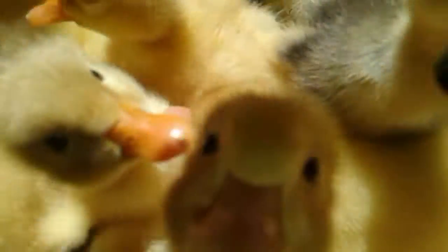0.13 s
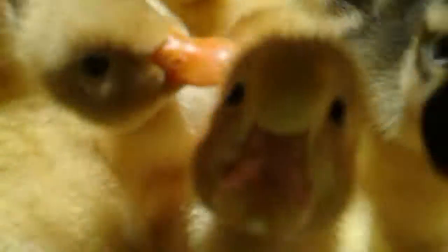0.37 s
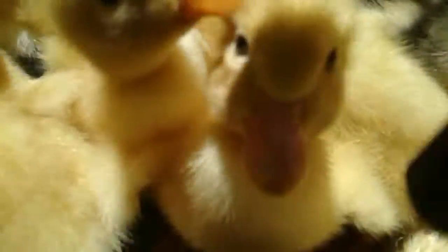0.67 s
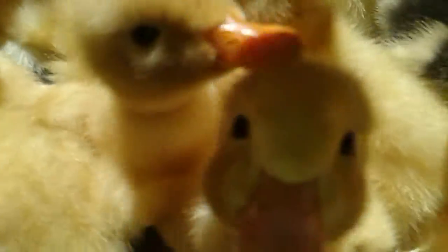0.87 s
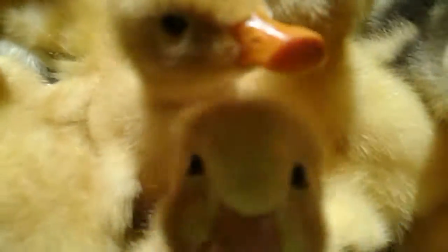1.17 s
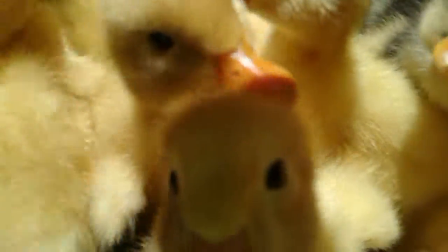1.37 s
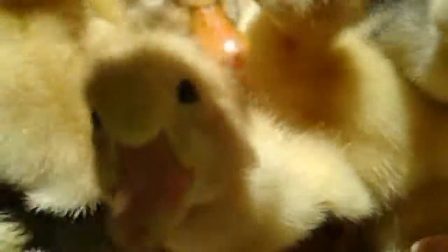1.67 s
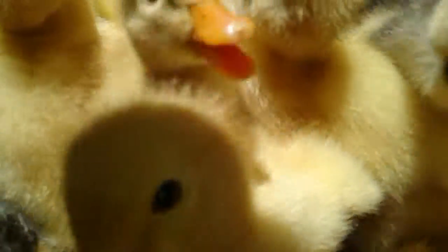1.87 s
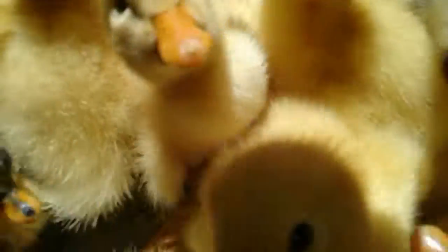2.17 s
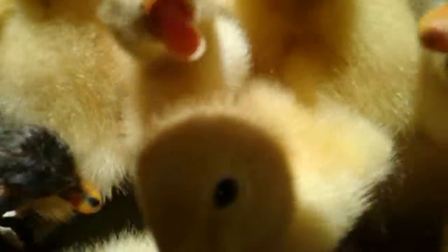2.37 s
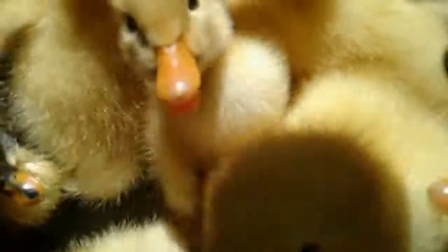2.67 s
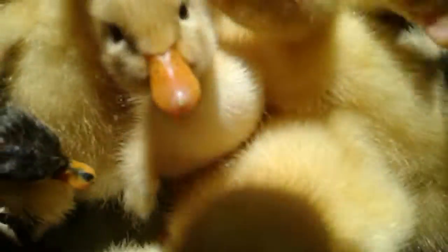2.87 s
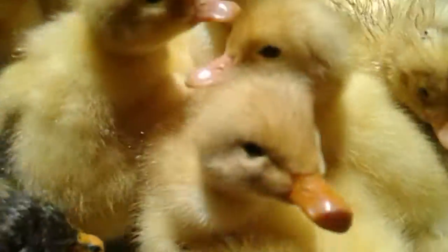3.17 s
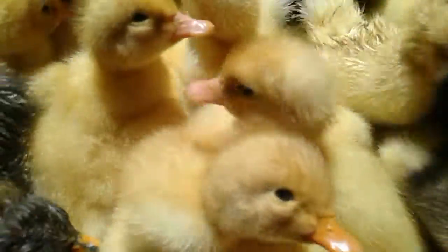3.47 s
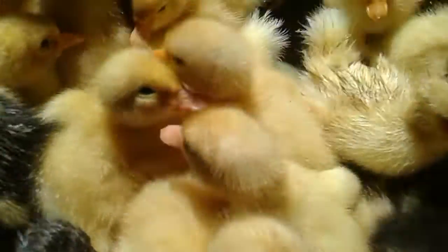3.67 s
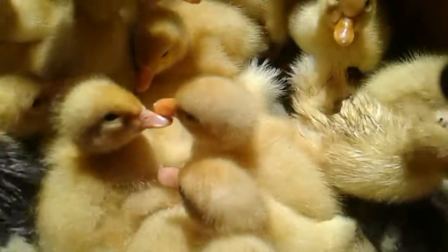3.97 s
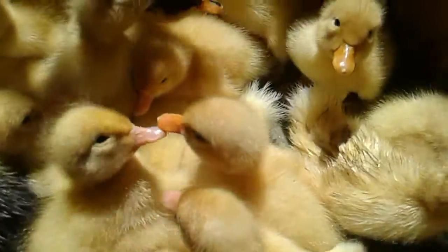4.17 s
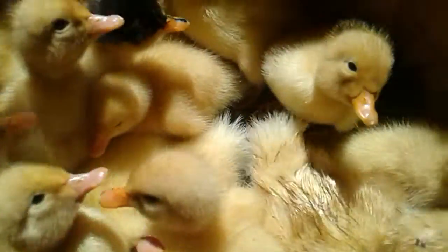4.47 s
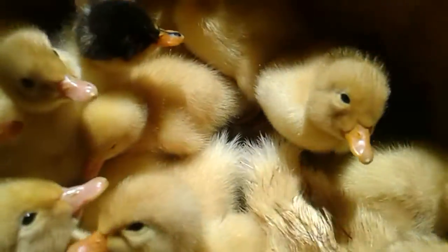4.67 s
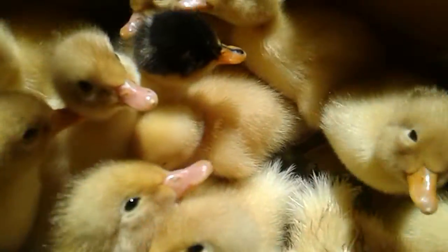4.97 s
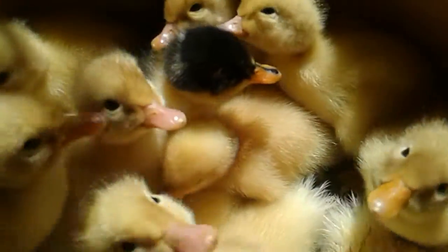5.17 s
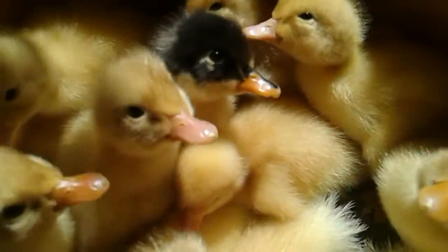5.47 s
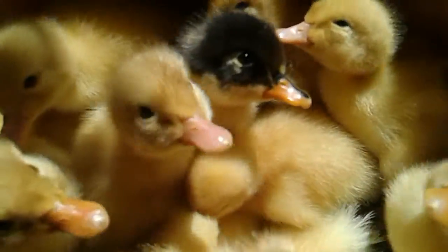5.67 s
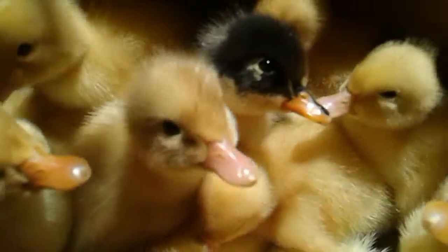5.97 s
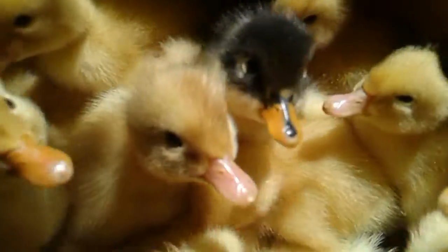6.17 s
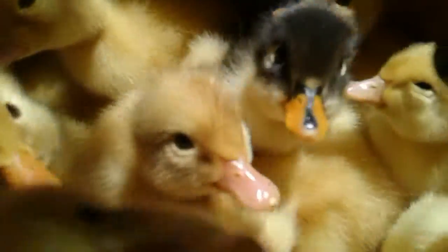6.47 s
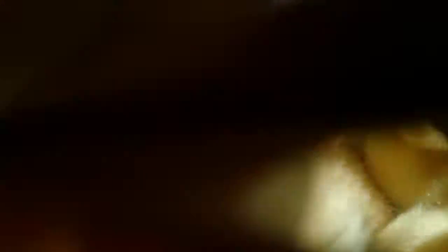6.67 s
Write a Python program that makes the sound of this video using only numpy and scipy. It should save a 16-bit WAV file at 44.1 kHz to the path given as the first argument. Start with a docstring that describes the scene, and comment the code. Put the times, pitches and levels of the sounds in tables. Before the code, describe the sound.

A nearby duckling peeps softly, then in loud, piercing, rough-edged cries three times a second until 4.8 seconds; small knocks and faint rustling remain.

```python
"""In a box, ducklings huddle close to a small microphone. One peeps about three times a second,
softly and then in loud cries: a near-sine whistle plus two overtones, roughened by a second voice until both lock.
Others give short arched chirps. Feet and bodies knock (decaying panel modes, noise bursts) and scrape
(gritty filtered noise); bright clicks (noise bursts) come alone or as the edge of a knock.
Padded steps shuffle over a rumble, a thin hiss and a low drone."""
import sys
import numpy as np
from scipy import signal
from scipy.fft import rfft, irfft
from scipy.io import wavfile

SR = 44100
rng = np.random.default_rng(int(sys.argv[2]) if len(sys.argv) > 2 else 0)


def wav_out(sig):
    """Save sig, one row per channel (or a flat mono array), as 16-bit PCM at SR to the path in sys.argv[1]."""
    wavfile.write(sys.argv[1], SR, np.round(np.clip(np.atleast_2d(sig).T, -1, 1) * 32767).astype(np.int16))


N = 300741

# calls of the nearest duckling: (start [s], length [s], top pitch [Hz], effort [0-1],
# base level [dB], base overtone level [dB], second voice level, independent of the call's level [dB])
CALLER_PEEPS = [ (.003, 0.093, 3040, 0.32, -32, -23, -42), (0.628, 0.097, 2934, 0.25, -39.5, -14.5, -47.5),
                (0.898, 0.11, 3390, 0.53, -40, -25.5, -46.5), (1.32, 0.11, 3320, .4, -35, -28.5, -47),
                (1.698, 0.11, 3340, 0.8, -33, -30.5, -48), (1.949, 0.11, 3650, 1, -27.5, -33.5, -36.5),
                (2.246, .12, 3690, 0.97, -27, -33.5, -39.5), (2.541, .12, 3734, 0.98, -27, -32.5, -38.5),
                (2.807, .12, 3910, 0.99, -26.5, -32, -36), (3.13, .12, 3684, 0.98, -27.5, -32, -43.5),
                (3.426, .12, 3670, 0.86, -27, -31.5, -40), (3.733, 0.12, 3814, 0.93, -27.5, -27, -37),
                (4.031, .121, 3740, 0.82, -29, -24.5, -35), (4.328, .12, 3650, 0.89, -27.5, -25.5, -33.5),
                (4.64, 0.12, 3740, 1, -28, -26, -36)]
# caller turned from the microphone, end values held: (time [s], how far away [0-1])
TURNED_AWAY = [(3.43, 0.25), (4.03, 1), (4.64, 0.54)]
# gain of the fundamental through bill and box: (frequency [Hz], gain [dB])
BILL_RESPONSE = [(1800, 10.5), (2150, 0.5), (2500, -0.5), (2950, -8.5), (3250, -0.5), (3550, 4.5),
                 (3900, 0), (4600, -0.5)]
# gain of the overtones through throat and open bill: (frequency [Hz], gain [dB])
THROAT_RESPONSE = [(3500, 9), (4800, 9), (6200, 6), (7400, -4.5), (8500, -3), (9800, 3.5), (11500, -16.5)]
# calls of the other ducklings: (start [s], length [s], top pitch [Hz], base level [dB],
# level change over the call [dB], pitch jitter [fraction of pitch])
FLOCK_CHIRPS = [ (0.202, 0.042, 5240, -48, 3, 0.01), (1.015, 0.052, 3500, -54.5, 6, 0.07),
                (1.27, 0.097, 3450, -62.5, -16, 0.02), (1.501, 0.071, 3400, -58, -36, 0.03),
                (1.685, 0.053, 3500, -51, 3, 0.04), (4.599, 0.087, 3290, -56.5, 5, 0.03),
                (4.681, .076, 3030, -53, -7, 0.02), (4.754, .066, 3730, -46.5, -1, 0),
                (4.822, 0.078, 3150, -52, 1, 0.02), (6.369, 0.043, 2530, -58.5, -6, 0.01),
                (6.549, 0.04, 2740, -59.5, -12, 0.05)]
# feet and bodies on the box: (time [s], panel pitch [Hz], base level [dB], hardness: clack over base level [dB])
BOX_KNOCKS = [(.05, 600, -52.5, 11), (0.116, 530, -48, -2), (.225, 600, -41, -4), (.301, 590, -44.5, -1),
              (0.332, 468, -32, -7.5), (.449, 560, -42.5, -1), (.478, 500, -49.5, -17),
              (1.115, 563, -36.5, 8), (1.939, 570, -46.5, 5), (2.14, 334, -42, 12), (2.306, 316, -53, 13.5),
              (2.376, 330, -45.5, 3), (2.451, 326, -46, 6), (2.471, 514, -41.5, -15), (2.48, 474, -38, -8),
              (2.797, 317, -50.5, -18), (2.837, 307, -42, -6.5), (3.027, 312, -45.5, -7),
              (4.666, 860, -58, 19.5), (5.599, 465, -46.5, -12), (5.625, 540, -48.5, -3),
              (5.904, 385, -44, -18), (6.102, 360, -47.5, 7), (6.283, 292, -43, -22),
              (6.308, 524, -37.5, 2), (6.448, 495, -48.5, 5.5), (6.583, 576, -34, 4),
              (6.592, 488, -28.5, 5.5), (6.627, 527, -50, 22), (6.644, 490, -37, 0),
              (6.726, 537, -45.5, -21)]
# modes of the box panel: (multiple of panel pitch [1], t60 [s], relative level [dB])
PANEL_MODES = [(.56, 0.029, -2.5), (1.002, 0.017, 9.5), (1.35, 0.02, -10.5)]
# bright clicks, some alone, some as the bright edge of a knock: (time [s], level of the upper burst [dB])
BRIGHT_CLICKS = [(.138, -45), (0.335, -42.5), (.794, -47), (.883, -43.5), (1.448, -42), (1.659, -41.5),
                 (1.778, -48), (1.939, -40), (2.468, -37), (4.228, -42.5), (4.478, -41), (5.625, -43),
                 (6.583, -26), (6.591, -33.5)]
# feet and down on the box: (start [s], length [s], scratch level before swell [dB],
# rub level before swell [dB], hiss mixed into the scratch [dB])
BOX_SCRAPES = [(2.114, .18, -44, -53, -3), (3.325, 0.18, -44.5, -57.5, -4), (3.738, 0.077, -46.5, -78, -3),
               (4.015, 0.1, -50.5, -65, -3), (4.342, 0.049, -43.5, -73, 5), (5.23, 0.31, -60, -61, 3),
               (5.683, 0.13, -58, -54.5, 0), (6.217, 0.081, -53.5, -57.5, -3)]
# restlessness of the huddle, used relative to its mean: (time [s], level [dB])
HUDDLE_STIR = [(0.0, -64), (0.15, -62.5), (0.3, -62.5), (0.49, -69.5), (1.42, -68.5), (1.63, -61),
               (1.92, -64.5), (2.3, -58.5), (2.47, -61), (2.6, -61.5), (2.92, -67), (3.28, -62),
               (4.75, -60), (4.96, -66.5), (5.22, -67), (5.37, -64.5), (6.67, -65.5), (6.82, -67)]
# spectral shape of the background: (frequency [Hz], relative gain [dB])
FLOOR_SHAPE = [(15, -43), (25, -20.5), (86, -6), (191, -1.5), (459, -8), (536, -9), (642, -8.5), (897, -12),
               (1100, -11.5), (1850, -12.5), (2390, -14), (3090, -19), (4660, -16), (6860, -20),
               (11800, -21.5), (15300, -57), (22000, -120)]
# low resonances of the room: (centre [Hz], width of each filter pass [Hz], level [dB])
DRONE_MODES = [(64.5, 10, -78.5), (102.9, 21.5, -69.5)]

# peep pitch: leap from rest to top, sag towards the knee under effort, drop as the bill closes
REST_HZ, KNEE_HZ = 1904, 3013
LEAP_S, SAG_FROM_S, SAG_LEAD_S = 0.028, 0.043, 0.016  # sag ends SAG_LEAD_S before the call does
SOFT_DROP_S, LOUD_DROP_S = 0.073, 0.018
# two voices choke each other until they lock; effort locks them sooner
JOIN_S, SOFT_LOCK_S, LOUD_LOCK_S = 0.019, 0.06, 0.043
CHOKE_DB, SWELL_LEAD_S, SWELL_LAG_S = -18, 0.02, 0.0042  # swell spans from before to after the lock
SOFT_SECOND_HZ, LOUD_SECOND_HZ = 4460, 4814
SOFT_SLIDE, LOUD_SLIDE = 0.14, 0.76  # fraction of the gap closed
SOFT_THROB_HZ, LOUD_THROB_HZ = 175, 318.5
# peep level: opening, blip of the fundamental, air running out, release
OPEN_DB, ATTACK_S, BLIP_DB, BLIP_S = -11.5, 0.022, 13.5, 0.01
SPEND_DB_PER_S, RELEASE_S, RELEASE_DB = 77, 0.01, -11.5  # spend rate at full effort
# overtones: choked before the lock, faded as the pitch drops below the knee
SOFT_THIRD_DB, LOUD_THIRD_DB = -9, -1.5
SOFT_MUTE_DB, LOUD_MUTE_DB, SECOND_FADE_DB, THIRD_FADE_DB = -11.5, -11, -10, -16
# turned away, the voice flutters more and its fundamental loses the upper resonance
NEAR_FLUTTER, AWAY_FLUTTER, AWAY_LOSS_DB = 0.017, 0.24, -9
CHIRP_REST_HZ, CHIRP_OVERTONE_DB = 1765, -10.5
FLOOR_DB, TOP_HZ = -58.5, 11850  # background before its level changes; upper band edge


def caller():
    """Nearest duckling: soft peeps build into loud cries, partly turned away."""
    out = np.zeros(N)
    for start_s, *call in CALLER_PEEPS:
        away = np.interp(start_s, *np.transpose(TURNED_AWAY))
        add(out, start_s, peep(*call, away))
    return out


def peep(length_s, top_hz, effort, level_db, overtone_db, second_db, away):
    """One call: pitch leaps up, sags, drops as the bill closes; rough until both voices lock."""
    count = int(length_s * SR)
    t = np.arange(count) / SR

    def by_effort(soft, loud):
        """Interpolate a setting between soft and loud calls."""
        return soft + (loud - soft) * np.clip(effort, 0, 1)

    lock_s = by_effort(SOFT_LOCK_S, LOUD_LOCK_S)
    unlocked = 1 - ramp(t, lock_s - 0.008, lock_s)
    choked = 1 - ramp(t, lock_s - SWELL_LEAD_S, lock_s + SWELL_LAG_S)

    # pitch
    sag_hz = by_effort(0, top_hz - KNEE_HZ)
    crest_hz = top_hz - sag_hz * ramp(t, SAG_FROM_S, length_s - SAG_LEAD_S)
    leap = 1 - (1 - ramp(t, 0, LEAP_S)) ** 2.3
    drop = 1 - ramp(t, length_s - by_effort(SOFT_DROP_S, LOUD_DROP_S), length_s) ** 2
    jitter = (0.0011 + 0.0077 * unlocked) * wobble(count, 886)
    hz = (REST_HZ + (crest_hz - REST_HZ) * leap * drop) * (1 + jitter)

    # level
    opening_db = OPEN_DB * (1 - ramp(t, 0, ATTACK_S))
    spent_db = by_effort(0, SPEND_DB_PER_S) * np.maximum(t - lock_s, 0)
    release_db = RELEASE_DB * ramp(t, length_s - RELEASE_S, length_s) ** 2
    air_db = opening_db - spent_db + release_db
    flutter = NEAR_FLUTTER + (AWAY_FLUTTER - NEAR_FLUTTER) * away
    flutter = (flutter + 0.049 * unlocked) * wobble(count, 590)
    strength = undb(level_db + air_db) * fade(count, 0.0025) * (1 + flutter)

    # colour
    blip_db = BLIP_DB * (1 - ramp(t, 0, BLIP_S) ** 2)
    turned_db = AWAY_LOSS_DB * away * ramp(hz, 2200, 3540)
    fundamental_db = CHOKE_DB * choked + blip_db + bill_db(hz) + turned_db
    low = 1 - ramp(hz, REST_HZ, KNEE_HZ)
    mute_db = by_effort(SOFT_MUTE_DB, LOUD_MUTE_DB) * choked
    overtone_db = overtone_db + mute_db + SECOND_FADE_DB * low
    third_db = by_effort(SOFT_THIRD_DB, LOUD_THIRD_DB) + THIRD_FADE_DB * low
    voice = strength * whistle(hz, overtone_db, third_db, fundamental_db)

    # rough stretch before the lock
    a, b = int(JOIN_S * SR), int(lock_s * SR)
    gap_hz = by_effort(SOFT_SECOND_HZ, LOUD_SECOND_HZ) - top_hz
    second = second_voice(hz[a:b], gap_hz, by_effort(SOFT_SLIDE, LOUD_SLIDE))
    voice[a:b] += undb(second_db) * second
    voice[a:b] *= throb(b - a, by_effort(SOFT_THROB_HZ, LOUD_THROB_HZ))
    return voice


def whistle(hz, overtone_db, third_db, fundamental_db=0):
    """Vibrating syrinx membrane: nearly a sine, two overtones shaped by the throat."""
    phase = 2 * np.pi * np.cumsum(hz) / SR
    fundamental = undb(fundamental_db) * np.sin(phase)
    second = colour_at(THROAT_RESPONSE, 2 * hz) * np.sin(2 * phase)
    third = colour_at(THROAT_RESPONSE, 3 * hz) * np.sin(3 * phase)
    return np.sqrt(2) * (fundamental + undb(overtone_db) * (second + undb(third_db) * third))


def second_voice(first_hz, gap_hz, slide, jitter=0.053, swell=0.75, rasp=0.19):
    """Other side of the syrinx: starts high and unsteady, swells, slides towards the first."""
    count = len(first_hz)
    u = np.linspace(0, 1, count)
    steady_hz = first_hz + gap_hz * (1 - slide * u ** 3)
    hz = steady_hz * (1 + jitter * (1.2 - u) * wobble(count, 1530))
    strength = u ** swell * fade(count, 0.0022) * (1 + rasp * wobble(count, 678))
    return strength * whistle(hz, overtone_db=-28, third_db=-20)


def throb(count, rate_hz, scatter=0.25, depth=0.5):
    """Until they lock, the two membranes choke each other in uneven pulses."""
    phase = 2 * np.pi * np.cumsum(rate_hz * (1 + scatter * wobble(count, 297))) / SR
    return (1 + depth * np.cos(phase)) / np.sqrt(1 + depth ** 2 / 2)


def bill_db(hz):
    """Gain [dB] of the fundamental as it sweeps the bill and box resonances."""
    return np.interp(hz, *np.transpose(BILL_RESPONSE))


def flock(flutter=0.28, arch=2.2):
    """Short contented chirps, each an arch of pitch; the more jittery, the raspier around the crest."""
    out = np.zeros(N)
    for start_s, length_s, top_hz, level_db, tilt_db, jitter in FLOCK_CHIRPS:
        count = int(length_s * SR)
        u = np.linspace(-1, 1, count)
        arch_hz = top_hz + (CHIRP_REST_HZ - top_hz) * np.abs(u) ** arch
        hz = arch_hz * (1 + jitter * wobble(count, 957))
        strength = undb(level_db + tilt_db * u / 2) * fade(count, 0.004)
        strength = strength * (1 + flutter * wobble(count, 337))
        # nearly closed bill: overtones fade as the pitch climbs
        muffle_db = np.interp(hz, [2500, 3200, 3800], [0, -8, -20])
        voice = strength * whistle(hz, CHIRP_OVERTONE_DB + muffle_db, -14, bill_db(hz))
        crest = (u > -0.55) & (u < 0.25)
        rasp = 36 * jitter * second_voice(np.minimum(hz[crest], 3800), gap_hz=887, slide=0.26)
        voice[crest] += undb(level_db) * rasp
        add(out, start_s, voice)
    return out


def knocks(thud_db=2, clack_db=0, tick_db=-19):
    """Steps thud in the panel and, if hard, clack at the contact; bright clicks stand alone or edge a knock."""
    out = np.zeros(N)
    t = np.arange(int(0.08 * SR)) / SR
    for start_s, panel_hz, level_db, hard_db in BOX_KNOCKS:
        thud = np.zeros(len(t))
        for ratio, t60_s, mode_db in PANEL_MODES:
            thud += undb(mode_db - 60 * t / t60_s) * np.sin(2 * np.pi * ratio * panel_hz * t)
        thud *= 1 - np.exp(-t / 0.00088)
        thud += 0.25 * burst(t, 740, 630, 0.11)  # box rattles on
        clack = undb(clack_db) * burst(t, 1170, 1250, 0.013)
        tick = undb(tick_db) * burst(t, 4600, 1430, 0.037)
        add(out, start_s, undb(level_db) * (undb(thud_db) * thud + undb(hard_db) * (clack + tick)))
    for start_s, level_db in BRIGHT_CLICKS:
        click = burst(t, 4760, 930, 0.0054) + 0.47 * burst(t, 2400, 1000, 0.021)
        add(out, start_s, undb(level_db) * click)
    return out


def burst(t, hz, width_hz, t60_s):
    """Brief, gritty contact: decaying noise rings one resonance; peak 1."""
    noise = rng.standard_normal(len(t)) * undb(-60 * t / t60_s)
    x = resonate_twice(noise, hz, width_hz)
    return x / np.abs(x).max()


def scrapes(grain_db=-0.5, rise=0.18):
    """Dense tiny slips of claws and down on the box, swelling fast and dying away."""
    out = np.zeros(N)
    for start_s, length_s, scratch_db, rub_db, hiss_db in BOX_SCRAPES:
        count = int(length_s * SR)
        slips = rng.standard_normal(count) * undb(grain_db * wobble(count, 810))
        scratch = resonate_twice(slips, 1660, 1660)
        scratch = scratch + undb(hiss_db) * resonate_twice(slips, 4400, 1200)
        rub = resonate_twice(slips, 470, 420)
        swell = np.interp(np.linspace(0, 1, count), [0, rise, 0.55, 1], [0.075, 1.0, 0.17, 0.26])
        add(out, start_s, swell * (undb(scratch_db) * unit(scratch) + undb(rub_db) * unit(rub)))
    return out


def shuffling(steps_per_s=60, steps_db=-67.0, follow=0.69, spread_db=4.5):
    """Many faint, padded steps of the huddle, a few heavier, ring three body resonances."""
    steps = (rng.random(N) < steps_per_s / SR) * rng.uniform(-0.55, 1, N)
    steps = steps * undb(spread_db * np.minimum(rng.exponential(size=N), 2))
    steps = signal.sosfilt(signal.butter(2, 1500, fs=SR, output="sos"), steps)
    body = resonate(steps, 470, 120) + 1.85 * resonate(steps, 299, 42) + 0.5 * resonate(steps, 723, 150)
    return undb(steps_db + follow * stir_db()) * unit(body)


def stir_db():
    """Restlessness of the huddle over time, relative to its mean [dB]."""
    level_db = np.interp(np.arange(N) / SR, *np.transpose(HUDDLE_STIR))
    return level_db - level_db.mean()


def reverberate(x, t60_s, wet_db, delay_s):
    """Diffuse reflections: convolution with delayed, decaying noise."""
    t = np.arange(int(0.6 * SR)) / SR
    tail = rng.standard_normal(len(t)) * undb(-60 * t / t60_s) * (t > delay_s)
    tail = tail / np.sqrt(np.sum(tail ** 2))
    return undb(wet_db) * signal.fftconvolve(x, tail)[:N]


def background(split_hz=400, bass_follow=0.12, treble_follow=0.62, treble_lift_db=-0.48):
    """Shaped noise: low room rumble and thin hiss, both following the huddle's stirring a little."""
    spectrum = rfft(rng.standard_normal(N))
    hz = np.arange(len(spectrum)) * SR / N
    noise = undb(FLOOR_DB) * unit(irfft(spectrum * colour_at(FLOOR_SHAPE, hz), N))
    bass = signal.sosfilt(signal.butter(1, split_hz, fs=SR, output="sos"), noise)
    hiss = undb(-66.0) * unit(resonate_twice(rng.standard_normal(N), 4690, 950))
    treble = noise - bass + hiss
    bass_db = bass_follow * stir_db() + 3.34 * wobble(N, 16)
    treble_db = treble_lift_db + treble_follow * stir_db() + 1.1 * wobble(N, 2.07)
    return bass * undb(bass_db) + treble * undb(treble_db)


def drone():
    """Faint, wavering low drone: noise through narrow room resonances."""
    out = np.zeros(N)
    for hz, width_hz, level_db in DRONE_MODES:
        out += undb(level_db) * unit(resonate_twice(rng.standard_normal(N), hz, width_hz))
    return out


def undb(db):
    """Decibels to gain."""
    return 10 ** (np.asarray(db) / 20)


def unit(x):
    """Scale to rms 1."""
    return x / np.sqrt(np.mean(x ** 2) + 1e-20)


def add(out, start_s, x):
    """Mix x into out from start_s on."""
    i = max(int(start_s * SR), 0)
    out[i:i + len(x)] += x[:N - i]


def colour_at(points, hz):
    """Gain at hz from a table of (frequency [Hz], gain [dB]), over log frequency."""
    point_hz, point_db = np.transpose(points)
    return undb(np.interp(np.log(hz + 1), np.log(point_hz), point_db))


def resonate(x, hz, width_hz):
    """One resonance, gain 1 at its centre."""
    return signal.lfilter(*signal.iirpeak(hz, hz / width_hz, fs=SR), x)


def resonate_twice(x, hz, width_hz):
    """The same resonance in two passes: steeper skirts."""
    return resonate(resonate(x, hz, width_hz), hz, width_hz)


def wobble(count, rate_hz):
    """Random values of spread 1.3 drawn rate_hz times a second, joined by straight lines."""
    at = np.arange(count) / SR * rate_hz
    points = int(at[-1]) + 2
    return np.interp(at, np.arange(points), 1.3 * rng.standard_normal(points))


def fade(count, edge_s):
    """Rounded opening and closing."""
    return signal.windows.tukey(count, min(2 * edge_s * SR / count, 1))


def ramp(x, start, end):
    """Linear rise from 0 to 1 between start and end."""
    return np.clip((x - start) / (end - start), 0, 1)


def scene():
    """All near sounds ring briefly in the box and faintly in the room, over the background."""
    near = caller() + flock() + knocks() + scrapes() + shuffling()
    box = reverberate(near, t60_s=0.05, wet_db=-19, delay_s=0.002)
    room = reverberate(near, t60_s=0.27, wet_db=-20, delay_s=0.0087)
    return (near + box + room + background() + drone())[None]


def record(dry, bass_cut_hz=42):
    """The small microphone loses the deep bass; the recorder cuts the top."""
    thin = signal.sosfilt(signal.butter(2, bass_cut_hz, "highpass", fs=SR, output="sos"), dry)
    return signal.sosfilt(signal.ellip(12, 0.2, 70, TOP_HZ, fs=SR, output="sos"), thin)


dry = scene()
out = record(dry)
wav_out(out)
```